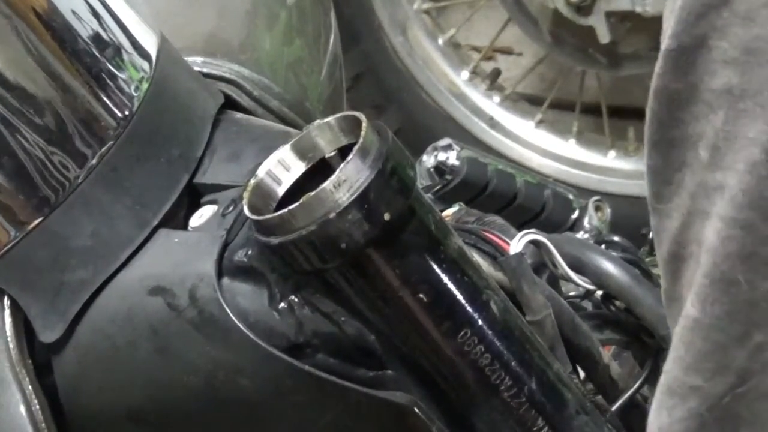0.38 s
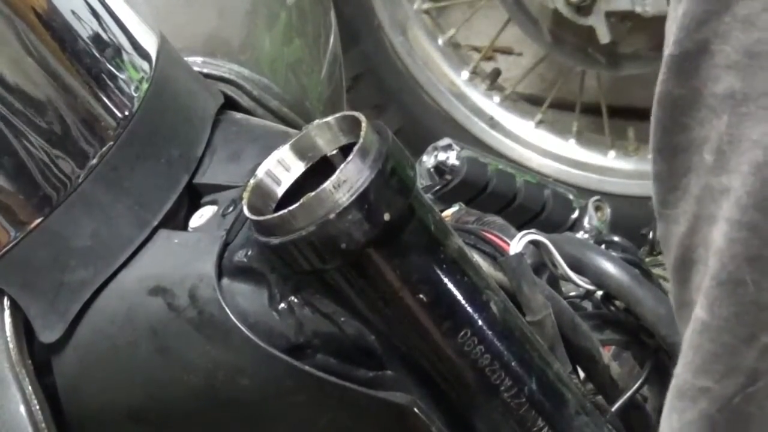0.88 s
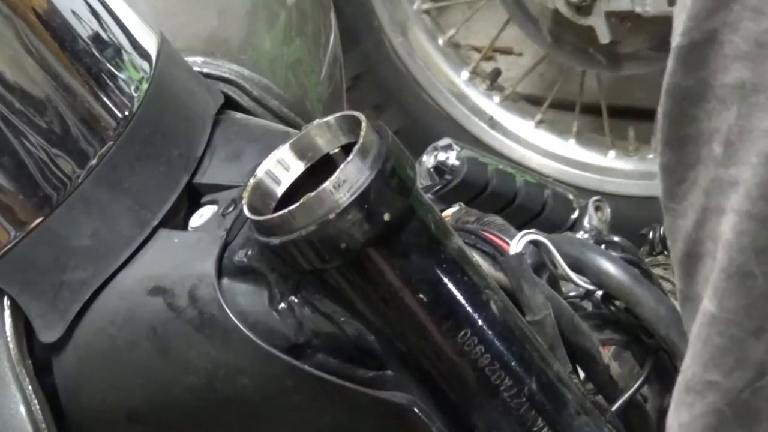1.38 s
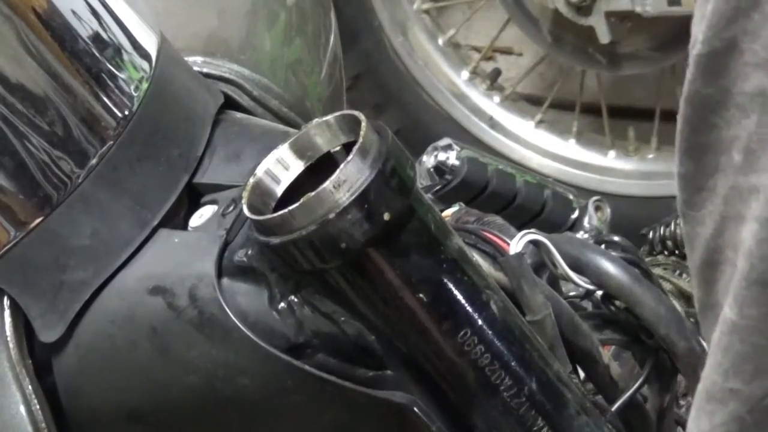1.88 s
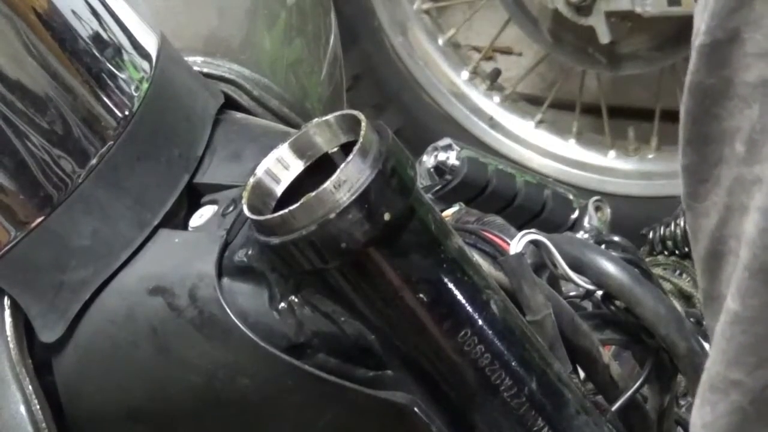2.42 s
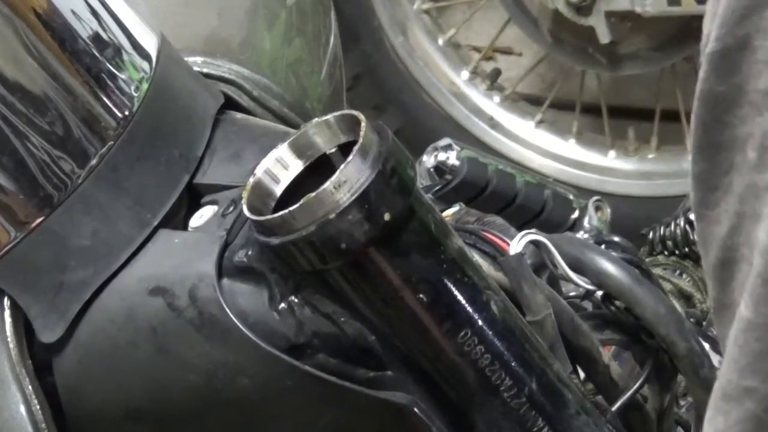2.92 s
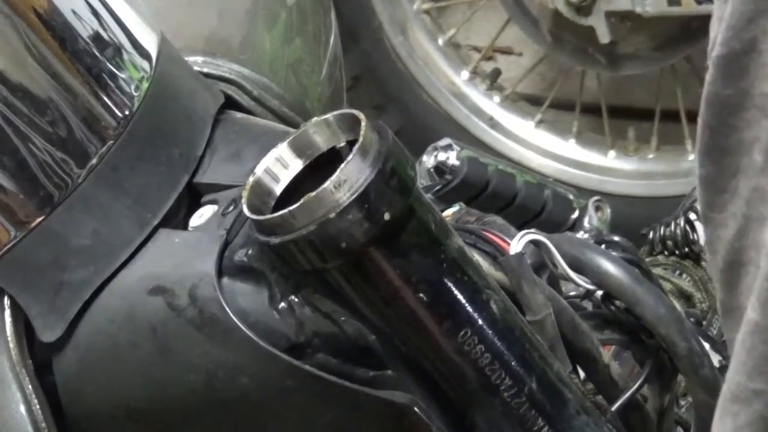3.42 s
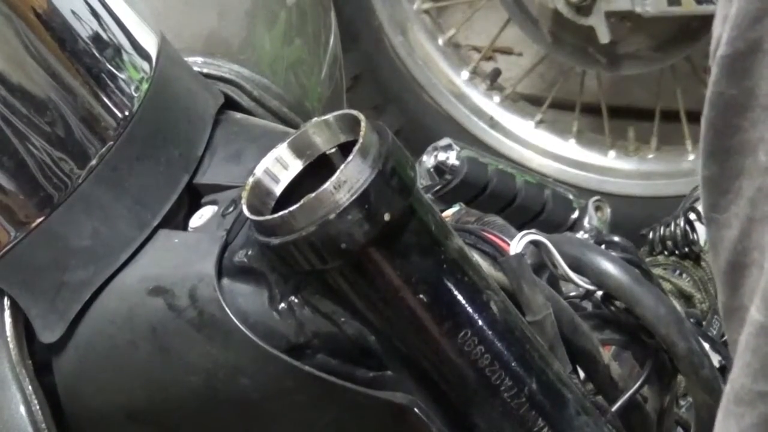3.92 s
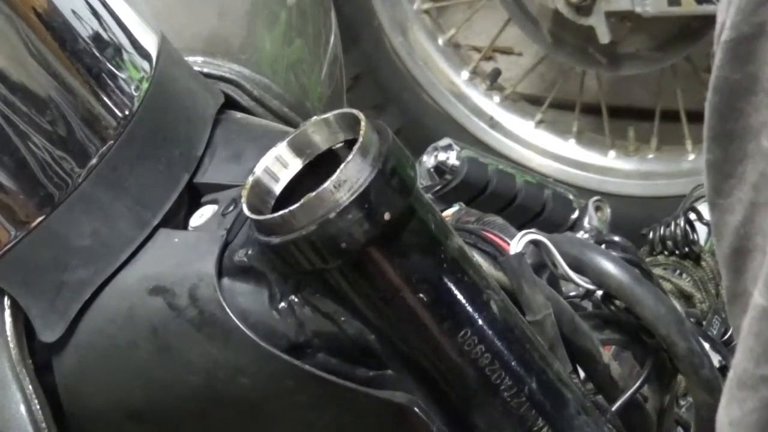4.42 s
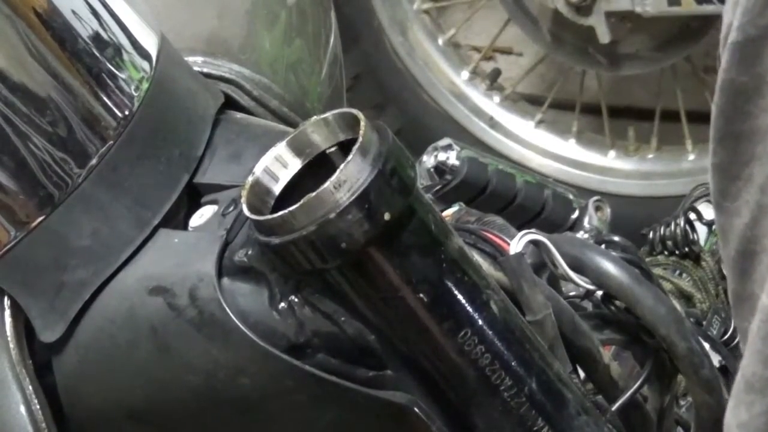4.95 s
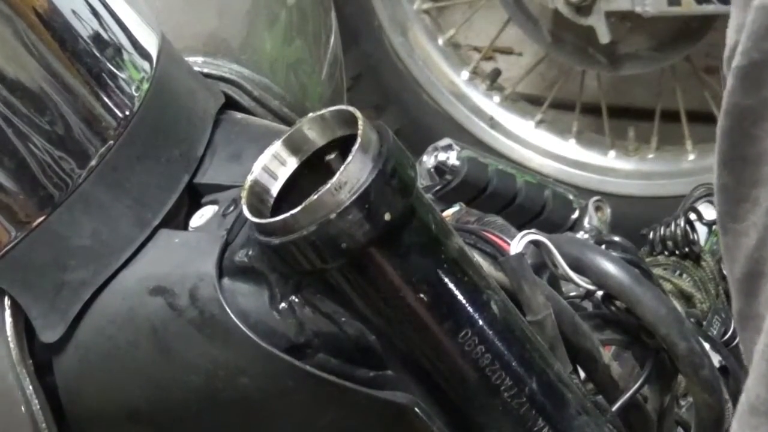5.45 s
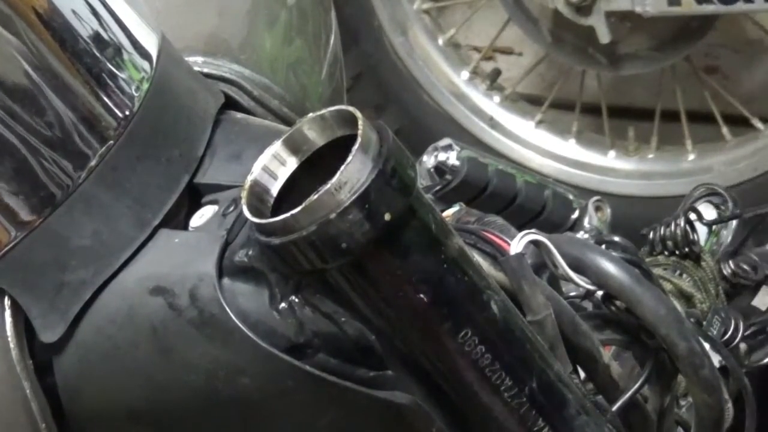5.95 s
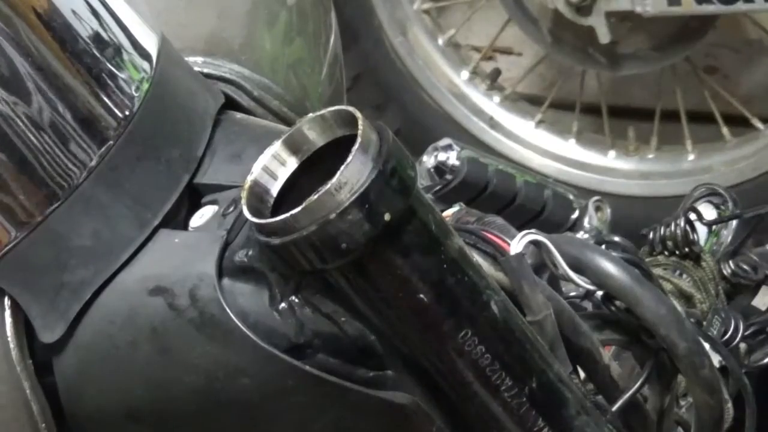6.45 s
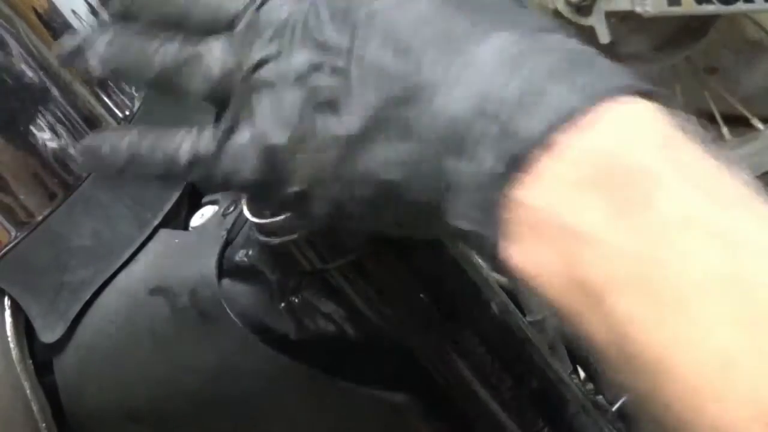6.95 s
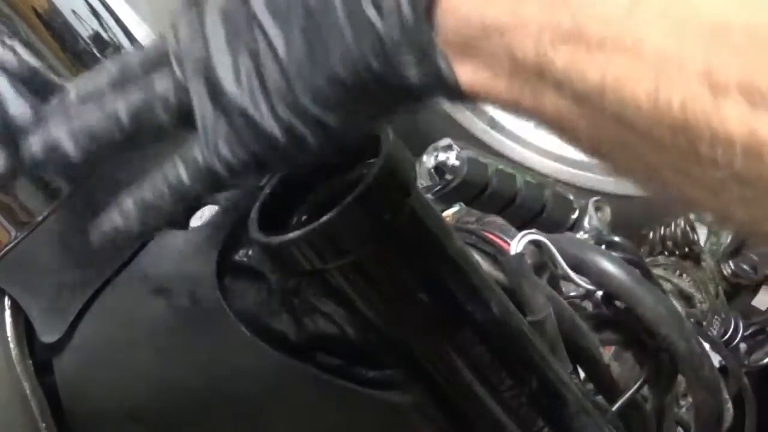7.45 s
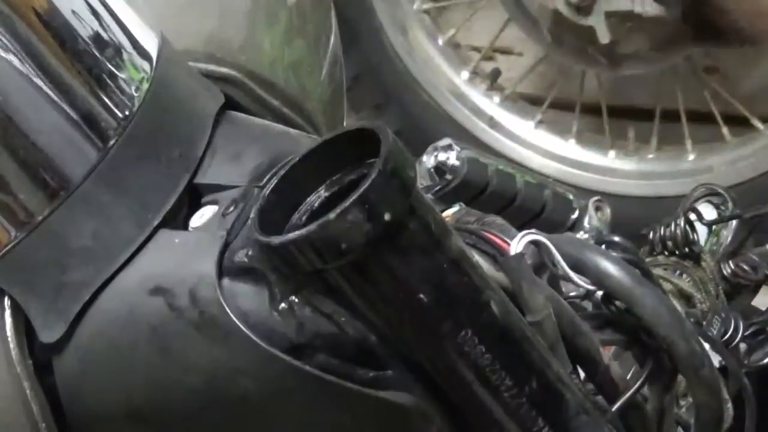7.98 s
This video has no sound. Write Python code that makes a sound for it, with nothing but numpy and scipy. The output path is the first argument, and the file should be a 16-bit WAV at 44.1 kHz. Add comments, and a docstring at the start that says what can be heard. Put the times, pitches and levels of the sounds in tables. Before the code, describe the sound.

Close stereo sound in a hard-walled workshop with quiet, steady room tone and hiss. From 0.2 to 5.0 seconds a hammer drives a steel punch against a tubular steel frame: sixteen blows, evenly spaced about 0.32 seconds apart, with slightly varying force and colour. Each has a sharp, bright, noisy crack, short tube clang, a varying thin punch ring, and a low thud blooming into the room echo; the thud weakens over the last few blows. Around 5.4 to 5.8 the punch scrapes faintly as it is drawn out, singing softly, with a cluster of light steel clinks. Gloves rustle faintly around 6.1, with small high ticks until 6.3. A clink and dull knock come at 6.45, then a loud, hard clatter at 6.63 to 6.7, echoing briefly. Afterwards only room tone, faint hollow drones and barely audible knocks near 7.4, 7.9 and 8.1.

```python
"""In a hard-walled workshop, a hammer drives a steel punch against a tubular steel frame in even blows.
Each blow is a noisy crack, ringing tube and punch modes, and a low thud, all with room echo.
Then the punch scrapes as it is drawn out and is laid down with two clinks and a clatter of short bursts.
Gloved hands rustle as shaped noise over steady room tone; a limiter flattens the start of loud blows.
"""
import sys
import numpy as np
from scipy import signal
from scipy.fft import rfft, irfft, next_fast_len
from scipy.io import wavfile
from scipy.ndimage import uniform_filter1d, minimum_filter1d

SR = 44100
rng = np.random.default_rng(int(sys.argv[2]) if len(sys.argv) > 2 else 0)


def output_pcm(signal):
    """Save a mono or channel-first signal as 16-bit PCM at the path in sys.argv[1].

    Samples are clipped to [-1, 1] before scaling.
    """
    pcm = np.clip(np.atleast_2d(signal).T, -1, 1) * 32767
    wavfile.write(sys.argv[1], SR, np.round(pcm).astype(np.int16))


def decibels_to_gain(level_db):
    """Convert a level in decibels to a linear amplitude gain (20 dB per decade)."""
    exponent = np.asarray(level_db, float) / 20
    return 10 ** exponent


N = 357210  # length of the scene in samples
T = np.arange(round(.6 * SR)) / SR  # time inside one short sound, seconds

# Levels in the tables are relative: the functions add the trims that set the final balance.
# Hammer blows: start_s, level_db, low_clang_db, middle_clang_db, punch_ring_db (last three against level_db)
HAMMER_BLOWS = [(.181, -24, -11, -5.5, -19), (0.5116, -24.5, -12, -12, -7),
                (0.8099, -21.5, -12.5, -17.5, -30.5), (1.1333, -25, -10.5, -13, -24.5),
                (1.465, -24.5, -10.5, -12, -32.5), (1.7784, -21.5, -10.5, -14, -19.5),
                (2.1083, -21, -10.5, -12.5, -21), (2.433, -24, -10.5, -15.5, -26.5),
                (2.7417, -26.5, -5, -4.5, -16), (3.069, -25, -5, -2, -8), (3.387, -20, -13, -9, -27),
                (3.7283, -23.5, -8, -7, -8), (4.0478, -19.5, -12, -9.5, -29), (4.371, -21, -9, -9.5, -17),
                (4.699, -22.5, -11, -10.5, -33), (5.007, -23.5, -11, -8, -19)]
# How firmly the driven part passes a blow to the frame, until it works loose: time_s, thud_db
GRIP_ON_FRAME = [(.18, -31.5), (.5, -28.5), (3.8, -27.5), (4.0, -34), (4.75, -35), (5.0, -45)]
# Colour of the crack of a blow: pitch_hz, level_db
CRACK_COLOUR = [(300, -33), (700, -11.5), (1200, -5.5), (1900, 1), (2600, -2.5), (3500, 0.5), (4200, -1.5),
                (5500, 7), (6500, 10), (7700, 3.5), (8500, 5.5), (10000, -4), (11000, -8)]
# Clang of the tube wall: pitch_hz, level_db, t60_s (time to fall by 60 dB)
TUBE_MODES = [(1600, -12, .04), (1850, -2, .07), (2150, -3, .07), (3160, -4, .03), (3550, -7, .025),
              (4400, -6, .025), (5780, 2, .04), (6150, 1, .03), (6550, -1, .04), (7000, -1, .03),
              (7280, -1, .06), (8250, 0, .03), (8850, -4, .03)]
# Ring of the punch: pitch_hz, level_db, t60_s
PUNCH_MODES = [(2830, 0, 0.21), (2850, -6, 0.2), (5132, 3, 0.19), (5170, -5, 0.11), (8200, -5.5, 0.25),
               (12850, 18, .3)]
# Low modes of the frame: pitch_hz, level_db, t60_s
FRAME_MODES = [(245.2, -4, 0.21), (315.4, -7.5, 0.13), (338, -24.5, 0.19), (437, 2.5, 0.33),
               (447, -2.5, 0.4), (487, -15, 0.25), (560, -1.5, 0.042), (570, -13.5, 0.39),
               (614.5, -5.5, 0.29), (699, -11.5, 0.15), (794, -13.5, 0.35)]
# Lowest modes of the whole machine: pitch_hz, level_db, t60_s
STAND_MODES = [(96.6, -5, 0.18), (167.9, -2, 0.35), (262.1, -5, 0.52)]
# Many small modes of the thud, as one colour: pitch_hz, level_db
THUD_COLOUR = [(110, -48), (170, -59.5), (260, -4.5), (340, -7.5), (450, 4.5), (600, -11.5), (800, -32),
               (1400, -18.5)]
# Light contacts of the punch: start_s, click_db, ring_db (against the click), low_modes_db, high_modes_db
PUNCH_TAPS = [(5.454, -51, 4, -25, 0.5), (5.601, -44, 10, -1.5, 2.5), (5.628, -21, -3, -9.5, -2),
              (5.644, -22, -10, 0, 2.5), (5.67, -27, -4.5, -12, -0.5), (5.735, -33.5, 0, -9, 11.5),
              (5.745, -26.5, -3, -6, 8.5), (6.4479, -23, 4, -2.5, -8), (6.6251, -17.5, -2, 4.5, -0.4),
              (6.691, -19, 12.5, -7.5, -11.5)]
# Colour of steel touching steel: pitch_hz, level_db
CLICK_COLOUR = [(600, -44.5), (1200, 1), (3000, -1), (5500, 9.5), (7200, 2), (9000, 4.5), (11000, -22.5)]
# Pulls of the punch along the tube: peak_s, rise_s, fall_s, rasp_db, ring_db
SCRAPE_PULLS = [(5.455, .025, 0.17, -58, -42), (5.53, 0.097, 0.21, -51.5, -34),
                (5.66, .08, 0.087, -57, -44), (5.76, 0.14, 0.046, -65.5, -28)]
# Colour of the rasp: pitch_hz, level_db (per Hz)
RASP_COLOUR = [(120, -41), (200, -3), (1110, -4.5), (4160, -12), (5170, -7), (5530, -9), (8270, -28.5),
               (11000, -20.5), (14300, -42), (22000, -120)]
# Dull knocks and ticks of things set down: start_s, level_db, centre_hz, width_octaves
SET_DOWN_KNOCKS = [(6.15, -37, 6000, 1.1), (6.189, -40, 6800, .55), (6.2197, -25.5, 9800, .7),
                   (6.2927, -34.5, 7000, 1.1), (6.4486, -28.5, 1720, 1.2), (6.6762, -6, 1760, 1.3),
                   (6.6856, -6.5, 2870, 0.47), (6.704, -11, 2500, 0.92), (7.3846, -42.5, 1520, 1.8),
                   (7.9124, -52, 1840, 1.2), (8.082, -40, 1350, 1.5)]
# What the knocks ring with: pitch_hz, level_db, t60_s
BENCH_MODES = [(330, -16, .05), (700, -9.5, 0.063), (1208, -2.5, 0.11), (1487, 6.5, 0.09),
               (2320, -20, 0.038), (2971, 9, 0.076), (3425, 8.5, 0.023), (6940, 5.5, 0.024)]
# How much a knock echoes, by its centre: centre_hz, echo_db
KNOCK_ECHO = [(1400, 5), (2800, -0.5), (7000, -15.5)]
# Glove rustles: peak_s, rise_s, fall_s, level_db
GLOVE_RUSTLES = [(6.065, 0.17, .2, -57.5), (6.215, 0.061, .16, -65)]
# Colour of the rustle: pitch_hz, level_db (per Hz)
RUSTLE_COLOUR = [(1180, -24.5), (2000, 0.5), (3160, 1), (3540, 3), (6090, 5), (11000, -2), (14300, -19),
                 (22000, -120)]
# Faint hollow drones: peak_s, rise_s, fall_s, level_db
HOLLOW_DRONES = [(6.96, 0.28, 0.098, -55.5), (7.09, 0.089, 0.37, -63), (7.436, 0.163, 0.078, -63),
                 (8.09, 0.14, .2, -56)]
# Colour of the drones: pitch_hz, level_db (per Hz)
DRONE_COLOUR = [(350, -25), (520, 16.5), (620, 13.5), (740, 13.5), (1000, -2.5)]
# Colour of room tone and microphone hiss: pitch_hz, level_db (per Hz)
AIR_COLOUR = [(15, -41), (25, -11), (128, -8), (188, -15.5), (269, -12.5), (306, -18), (415, -12.5),
              (460, -15), (710, -17), (1280, -19), (8240, -26), (11200, -31.5), (14600, -68.5),
              (22000, -120)]
# How alike left and right are in the room tone: pitch_hz, likeness (1 = the same)
AIR_LIKENESS = [(60, 1), (350, 0.35), (2010, 0.14), (11600, 0.6)]
# How fast the main part of the echo dies: pitch_hz, t60_s
ROOM_DECAY = [(150, 0.33), (500, 0.39), (2000, 0.39), (5000, 0.34), (8000, 0.32), (11000, 0.21)]
# How alike left and right are in the echo: pitch_hz, likeness (1 = the same)
ECHO_LIKENESS = [(60, 0.66), (170, 1), (490, 0.9), (1410, 0.57), (4050, 0.72), (11600, 0.67)]
# Bass cut on all the near sounds: pitch_hz, level_db
NEAR_BASS_CUT = [(40, -22), (100, -10), (160, 0)]
# Lean of the near sounds to one side: pitch_hz, left_minus_right_db
SIDE_LEAN = [(200, 0), (700, 1.2), (1500, 1.2), (3000, .3), (10000, -.2)]
# Steep loss of treble above 11 kHz: pitch_hz, level_db
TOP_CUT = [(10900, 3), (11300, -27.5), (16000, -36.5)]


def hammer():
    """Each blow: a crack of steel, the clang of the tube, the thud of the frame, the ring of the punch."""
    out = np.zeros((2, N))
    boom = echo(pulse(THUD_COLOUR), rise=0.064)  # frame and room stay put, so every thud tumbles alike
    for start, level_db, low_db, middle_db, ring_db in HAMMER_BLOWS:
        thud_db = np.interp(start, *np.transpose(GRIP_ON_FRAME))
        seat = [(1700, low_db), (3000, middle_db), (5500, -15.5)]  # how the punch sits colours the clang
        bands = np.arange(300, 11500, 230)
        chance_db = 3.5 * rng.standard_normal(len(bands))  # each blow wakes other clusters of small modes
        colour_db = along(CRACK_COLOUR, bands) + along(seat, bands) + chance_db
        colour = np.transpose([bands, colour_db])

        tube = decibels_to_gain(-5) * ring(TUBE_MODES, scatter_db=2.0)
        clang = filtered(tube, lambda hz: decibels_to_gain(along(seat, hz)))
        punch = decibels_to_gain(ring_db + 9.0) * ring(PUNCH_MODES, 1.4, low_db=-18.5, high_db=-14)

        # The heavy frame blooms late.
        frame = decibels_to_gain(12.5) * (1 - np.exp(-T / 0.082)) * ring(FRAME_MODES, scatter_db=1.3)
        thud = decibels_to_gain(thud_db) * (frame + decibels_to_gain(37.0) * boom)
        # The whole machine shakes with a share of the thud's dB.
        stand = (1 - np.exp(-T / 0.032)) * ring(STAND_MODES, scatter_db=1.4)
        stand = decibels_to_gain(-12.5 + 0.56 * thud_db) * stand

        crack = decibels_to_gain(10.0) * burst(colour, 0.11)
        sent_to_room = decibels_to_gain(34.5) * pulse(colour) + decibels_to_gain(16) * clang + decibels_to_gain(3.0) * punch
        steel = crack + clang + punch + echo(sent_to_room)
        add(out, start, decibels_to_gain(level_db) * steel + thud + stand)
    return out


def taps():
    """A steel click, and the punch ringing after it."""
    out = np.zeros((2, N))
    for start, level_db, ring_db, low_db, high_db in PUNCH_TAPS:
        sing = decibels_to_gain(ring_db - 8) * ring(PUNCH_MODES, 1.5, low_db, high_db)
        click = decibels_to_gain(-13.5) * burst(CLICK_COLOUR, 0.038)
        sent_to_room = decibels_to_gain(11.0) * pulse(CLICK_COLOUR) + decibels_to_gain(-3.0) * sing
        add(out, start, decibels_to_gain(level_db) * (click + sing + echo(sent_to_room, rise=0.007)))
    return out


def scrape():
    """Uneven slips rasp along the tube and keep the punch singing."""
    rasp_gain, sing_gain = strokes(SCRAPE_PULLS)
    slips = rng.standard_normal(N)
    unevenness = uniform_filter1d(rng.exponential(size=N) ** 3, size=60)
    slips = unit(slips * unevenness)
    punch = decibels_to_gain(-41.5) * ring(PUNCH_MODES, 0, low_db=-42, high_db=-5.0)
    singing = signal.fftconvolve(sing_gain * slips, punch)[:N]
    rasp = unit(noise(RASP_COLOUR, N) * (1 + 0.32 * np.abs(slips)))
    return rasp_gain * decibels_to_gain(1.5) * rasp + singing


def knocks():
    """A burst around its own centre, shorter the higher it is; low knocks echo strongly, high ticks little."""
    out = np.zeros((2, N))
    for start, level_db, centre, octaves in SET_DOWN_KNOCKS:
        echo_db = along(KNOCK_ECHO, centre)
        colour = [(centre * 2 ** (-2 * octaves), -50),
                  (centre * 2 ** -octaves, -7),
                  (centre, 0),
                  (centre * 2 ** (0.69 * octaves), -4),
                  (centre * 2 ** (1.7 * octaves), -30)]
        # High ticks leave the bench still.
        bench = decibels_to_gain(echo_db - 24) * (centre < 4000) * ring(BENCH_MODES, 1.5)
        hit = decibels_to_gain(-8.5) * burst(colour, 55 / centre)
        sent_to_room = decibels_to_gain(echo_db + 5) * pulse(colour) + decibels_to_gain(-4) * bench
        add(out, start, decibels_to_gain(level_db) * (hit + bench + echo(sent_to_room)))
    return out


def hands():
    """Glove rustle and a hollow drone, both noise that swells and fades."""
    rustle = strokes(GLOVE_RUSTLES)[0] * noise(RUSTLE_COLOUR, N)
    drone = strokes(HOLLOW_DRONES)[0] * noise(DRONE_COLOUR, N)
    return rustle + drone


def air():
    """Steady room tone and hiss: coloured noise, partly different in left and right."""
    pair = np.array([noise(AIR_COLOUR, N), noise(AIR_COLOUR, N)])
    return decibels_to_gain(-63.5) * spread(pair, AIR_LIKENESS)


def echo(x, rise=0.035):
    """A fresh diffuse tail that builds up and dies band by band; far corners linger longer."""
    hz, t, z = signal.stft(rng.standard_normal((2, len(T))), SR, nperseg=256)
    fall_db = -60 * t / along(ROOM_DECAY, hz)[:, None]
    gain = decibels_to_gain(fall_db) + decibels_to_gain(-19.0 + .5 * fall_db)  # a weaker part falls half as fast
    tail = signal.istft(z * gain, SR, nperseg=256)[1][:, :len(T)]
    tail = spread(tail * (1 - np.exp(-T / rise)), ECHO_LIKENESS)
    tail = tail / np.linalg.norm(tail[0])
    return signal.fftconvolve(x[None], tail, axes=1)[:, :len(x)]


def ring(modes, scatter_db, low_db=0, high_db=0):
    """Damped modes with chance strengths; the point of contact favours low or high ones."""
    hz, db, t60 = np.transpose(modes)[:, :, None]
    db = db + scatter_db * rng.standard_normal(hz.shape)
    db = db + low_db * (hz < 4000) + high_db * (hz > 6000)
    tones = decibels_to_gain(db - 60 * T / t60) * np.sin(2 * np.pi * hz * T)
    return (1 - np.exp(-T / 0.0013)) * np.sum(tones, axis=0)


def burst(spectrum, t60):
    """A dying puff of coloured noise with a steep but finite rise."""
    return decibels_to_gain(-60 * T / t60) * (1 - np.exp(-T / 0.00048)) * noise(spectrum, len(T))


def pulse(spectrum):
    """A single impact of the given colour and unit energy."""
    spike = 1. * (np.arange(len(T)) == 40)
    x = filtered(spike, lambda hz: decibels_to_gain(along(spectrum, hz)))
    return x / np.linalg.norm(x)


def noise(spectrum, size):
    """Coloured noise of rms 1."""
    return unit(filtered(rng.standard_normal(size), lambda hz: decibels_to_gain(along(spectrum, hz))))


def strokes(rows):
    """Gain per sample for each dB column: every stroke swells to its peak and dies away."""
    peak, rise, fall, *cols = np.transpose(rows)[:, :, None]
    late = np.arange(N) / SR - peak
    shape_db = -20 * np.where(late < 0, -late / rise, late / fall)  # 20 dB per rise or fall time
    return [uniform_filter1d(decibels_to_gain(shape_db + db).sum(axis=0), size=900) for db in cols]


def spread(pair, alike):
    """Two unrelated signals made into left and right of a given likeness."""
    turn = lambda hz: np.arccos(np.clip(along(alike, hz), -1, 1)) / 2
    mid, side = filtered(pair, lambda hz: np.array([np.cos(turn(hz)), np.sin(turn(hz))]))
    return np.array([mid + side, mid - side])


def filtered(x, response):
    """x with each frequency scaled by a response."""
    m = next_fast_len(x.shape[-1] + 8192)
    return irfft(rfft(x, m) * response(np.fft.rfftfreq(m, 1 / SR)), m)[..., :x.shape[-1]]


def along(points, hz):
    """Read a value between (Hz, value) points on a log frequency axis."""
    f, v = np.transpose(points)
    return np.interp(np.log(hz + 1), np.log(f + 1), v)


def unit(x):
    """Scale to rms 1."""
    return x / np.sqrt(np.mean(x ** 2) + 1e-20)


def add(out, s, x):
    """Mix a sound into the stereo track at time s, in seconds."""
    part = out[:, round(s * SR):][:, :x.shape[1]]
    part += x[:, :part.shape[1]]


def scene():
    """All sources at the microphone pair; the tools are laid down to the right."""
    moves = scrape() + hands()
    to_the_right = decibels_to_gain([[-.8], [.8]])
    near = hammer() + to_the_right * (taps() + knocks()) + moves + decibels_to_gain(-4.5) * echo(moves)
    halves = [[.5], [-.5]]  # left gets half the lean, right the opposite half
    near = filtered(near, lambda hz: decibels_to_gain(along(NEAR_BASS_CUT, hz) + along(SIDE_LEAN, hz) * halves))
    return near + air()


def roll_off(x):
    """The treble ends steeply here."""
    return signal.sosfilt(signal.butter(12, 12210, fs=SR, output="sos"), x)


def record(dry):
    """The limiter ducks at once on a peak and lets go slowly; the top treble is rolled off."""
    heard = filtered(dry, lambda hz: decibels_to_gain(along(TOP_CUT, hz)))
    peak_db = 20 * np.log10(np.abs(heard).max(axis=0) + 1e-9)
    need_db = np.minimum(0, -6 - peak_db)  # turn down whatever passes -6 dB
    ramp = 110 * np.arange(N) / SR  # recovery, 110 dB per second
    held_db = np.minimum.accumulate(minimum_filter1d(need_db, size=33) - ramp) + ramp
    limited = heard * decibels_to_gain(uniform_filter1d(held_db, size=17))
    return roll_off(limited)


dry = scene()
out = record(dry)
output_pcm(out)
```